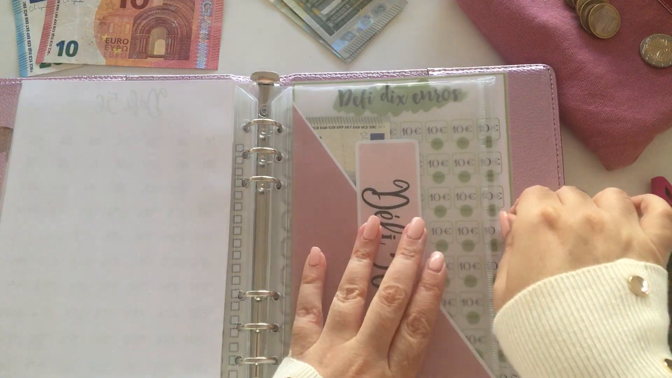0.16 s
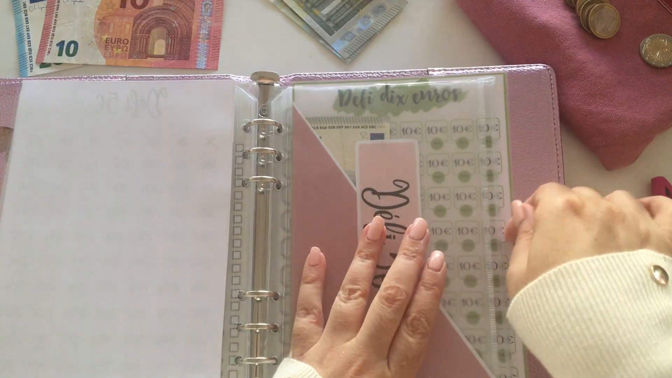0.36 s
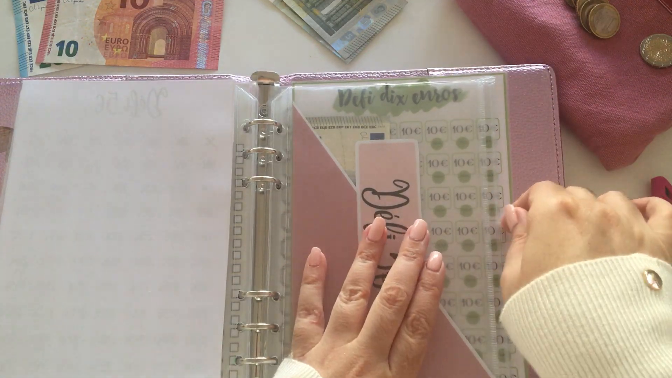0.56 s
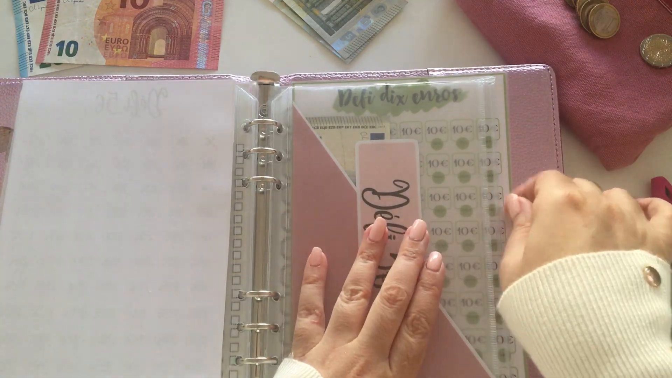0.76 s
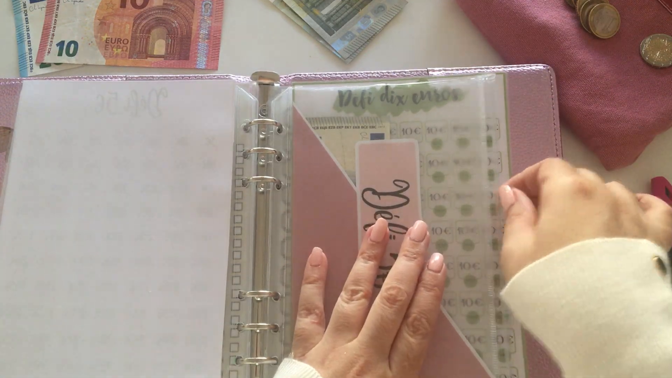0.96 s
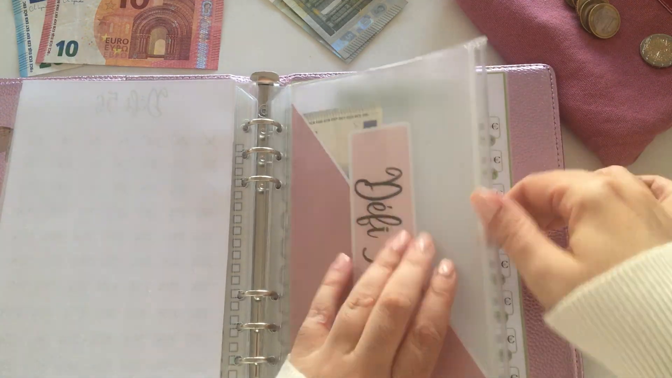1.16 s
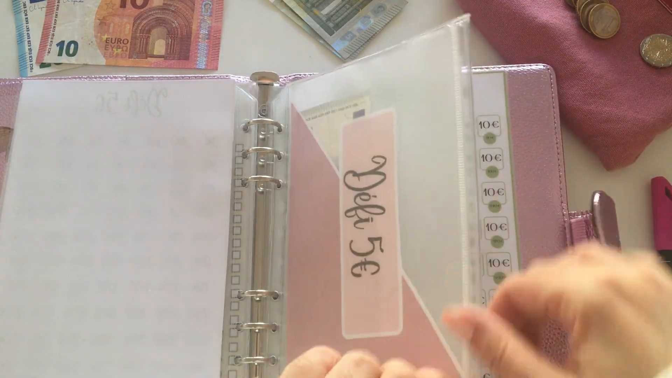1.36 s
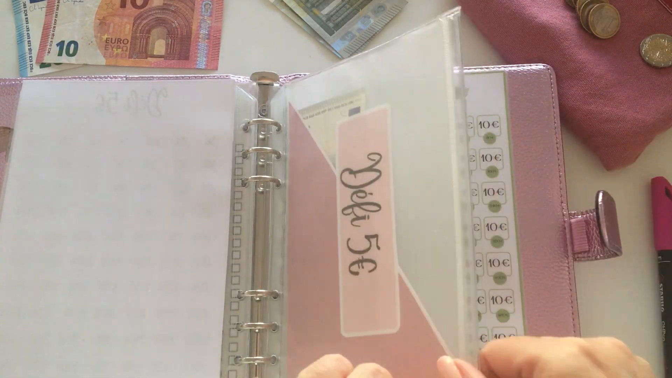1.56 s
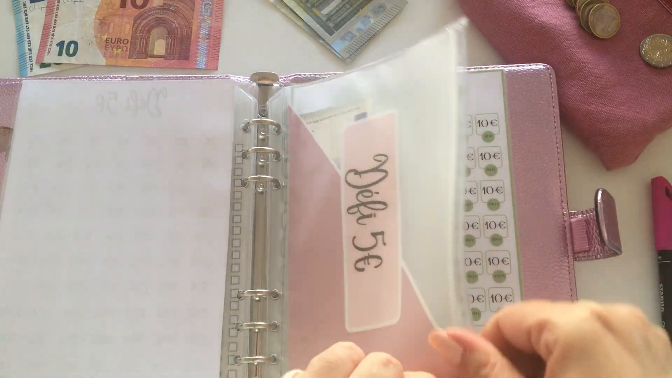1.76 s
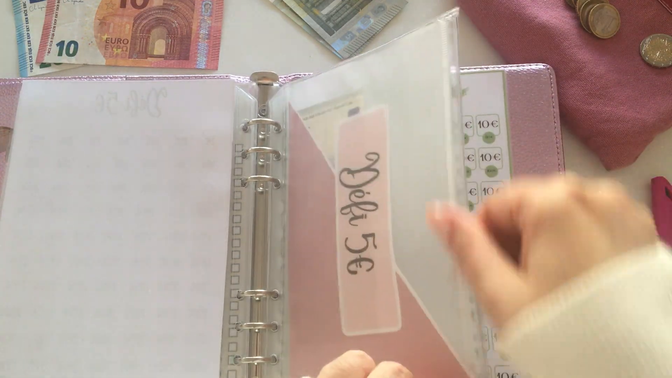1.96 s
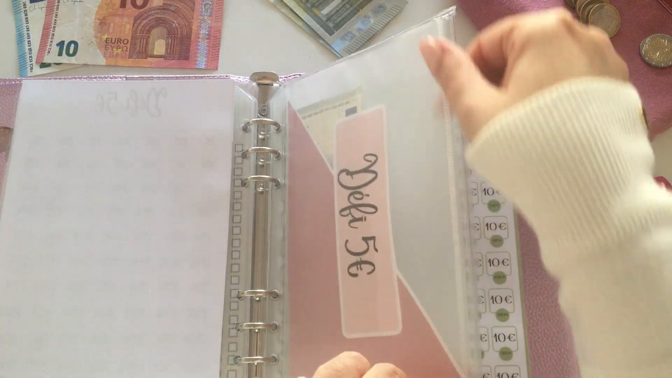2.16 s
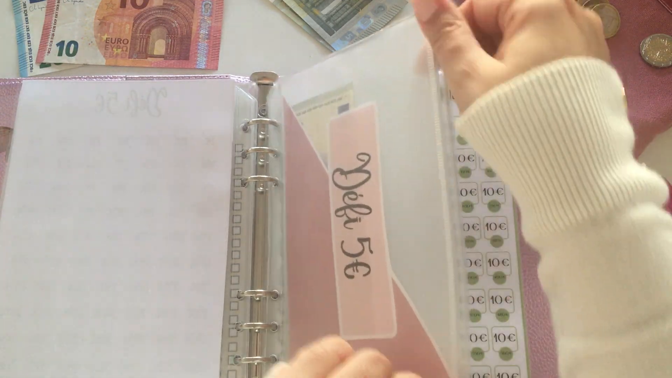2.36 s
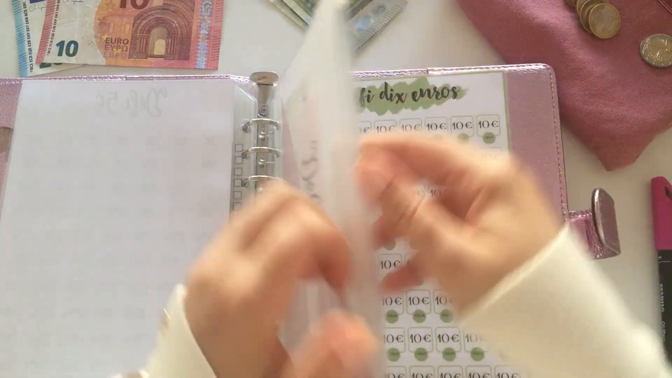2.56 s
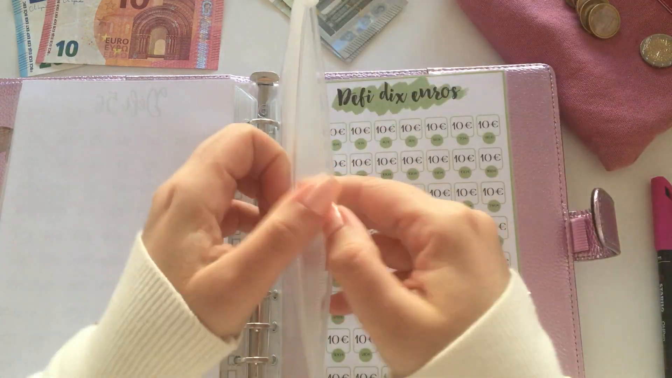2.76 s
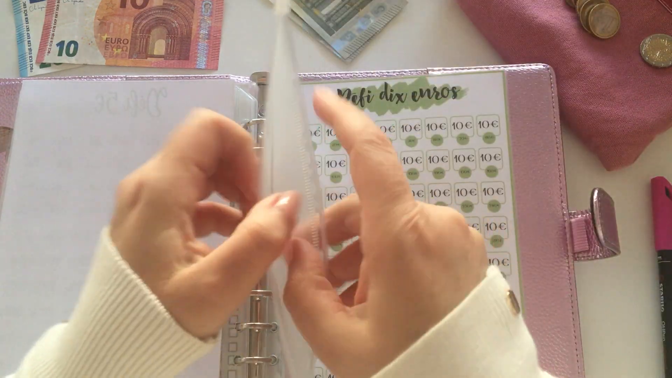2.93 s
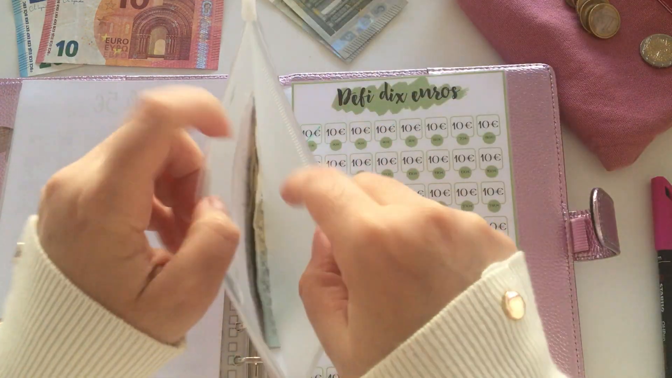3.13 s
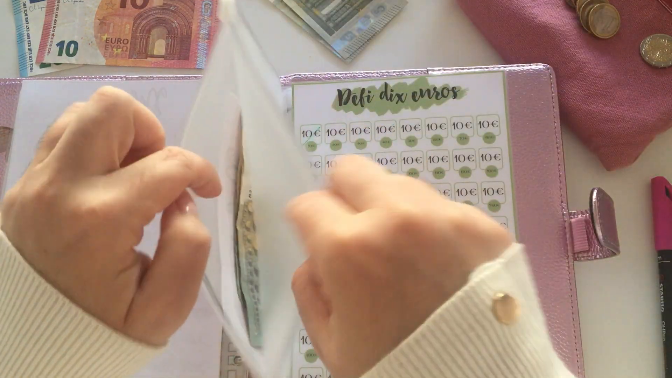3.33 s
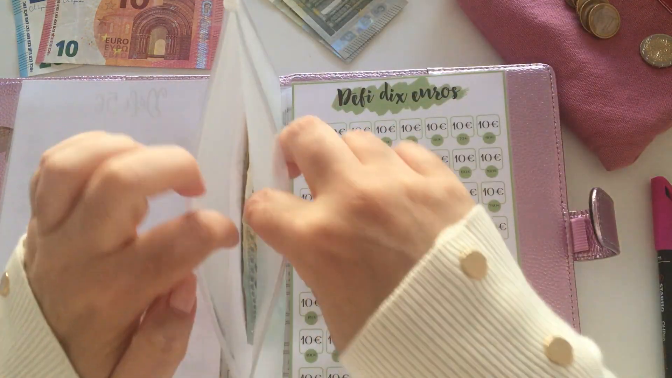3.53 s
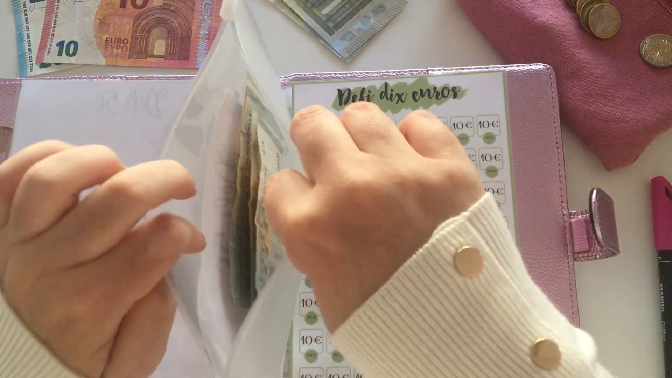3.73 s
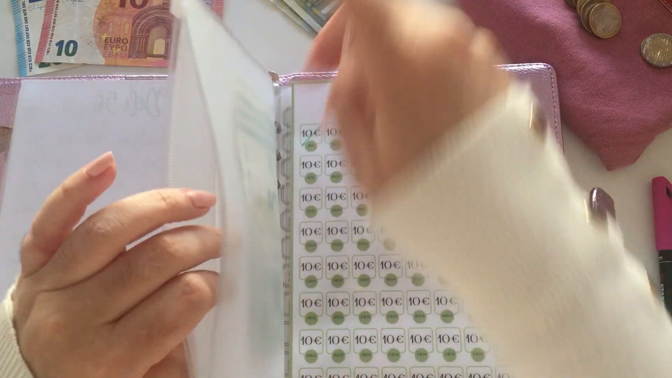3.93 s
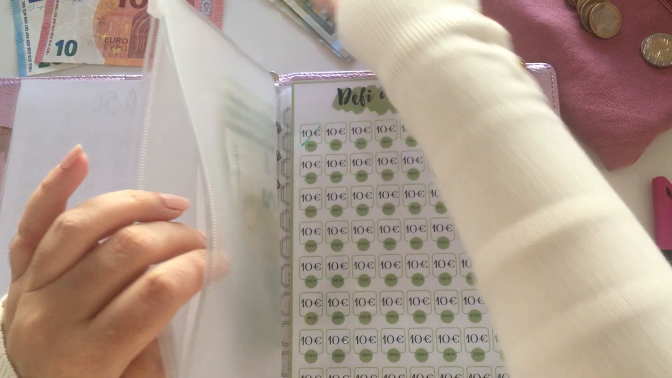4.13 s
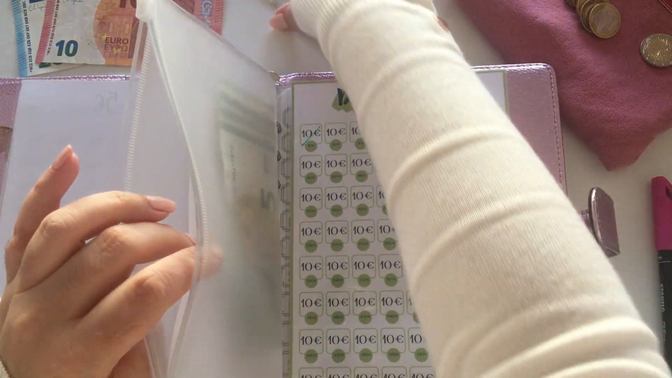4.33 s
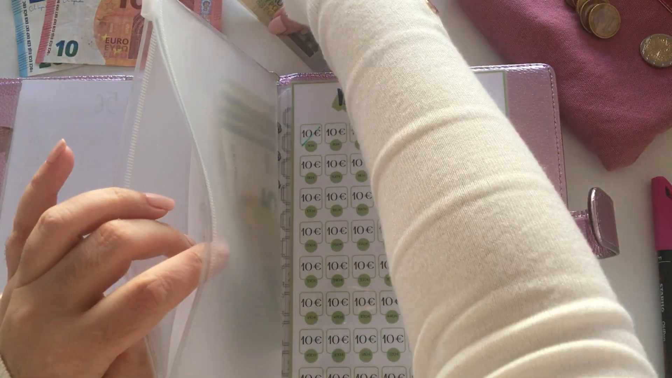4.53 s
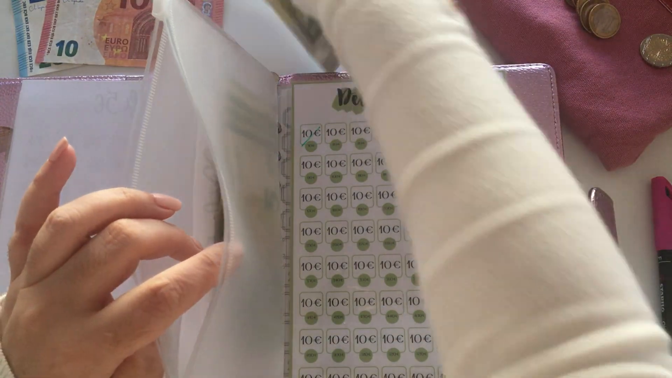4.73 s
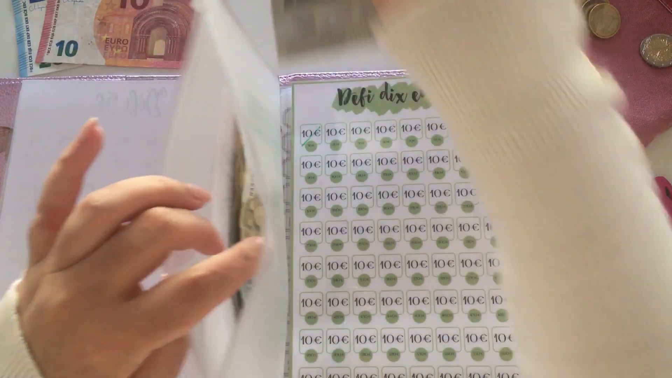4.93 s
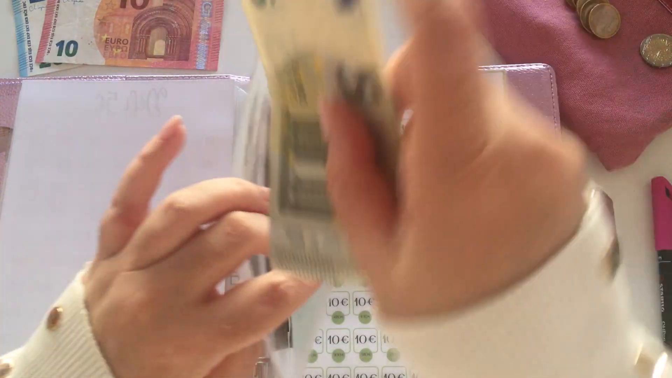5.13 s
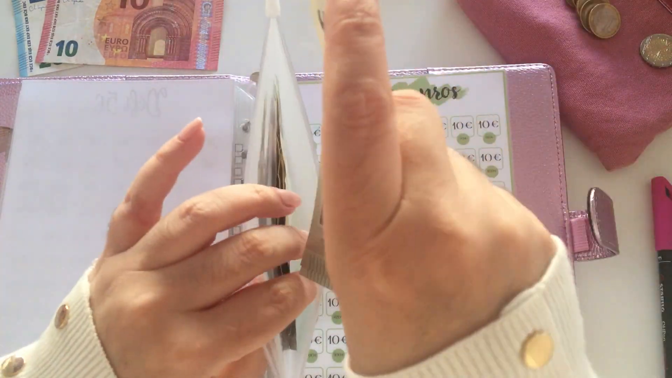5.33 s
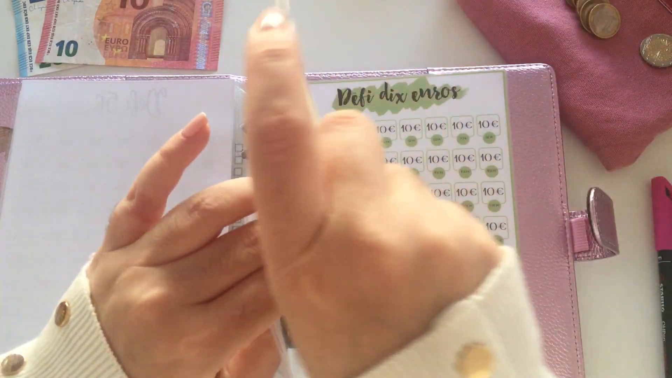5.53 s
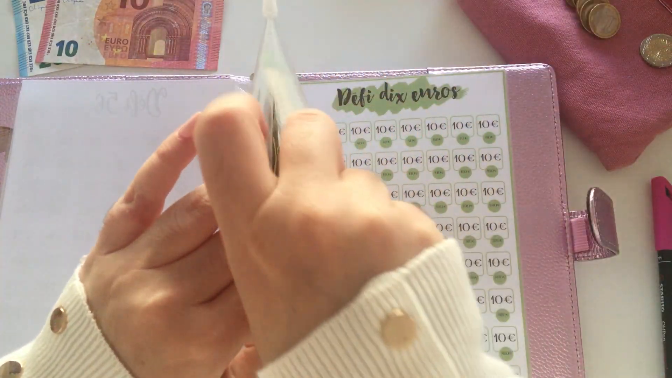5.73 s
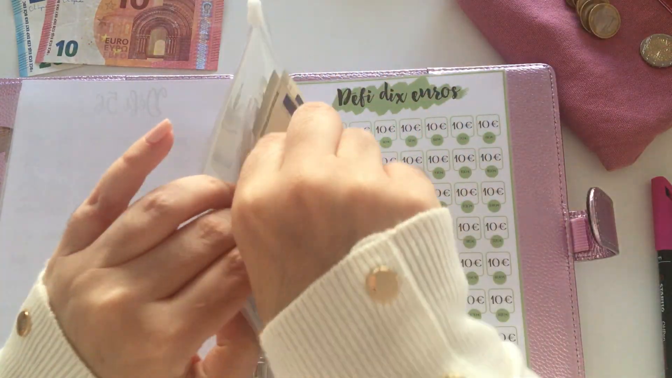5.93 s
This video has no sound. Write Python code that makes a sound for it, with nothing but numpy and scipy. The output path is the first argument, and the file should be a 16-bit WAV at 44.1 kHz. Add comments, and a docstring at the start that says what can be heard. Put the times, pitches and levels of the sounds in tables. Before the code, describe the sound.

Close, light rustling of plastic and paper in a small quiet room, broken by one loud hollow plastic pop and small sharp edge ticks.

```python
"""Banknote into a plastic sleeve

Hands turn a plastic sleeve in a ring binder on a table, open it and slide a banknote in, in a small quiet room.
Plastic and paper rub as filtered noise and tiny slips, in slides that speed up and slow to rest.
The stiff sleeve buckles with hollow pops and fingers bump the table: both are dying tones.
Edges flick as short noise bursts, a binder ring ticks, and soft air noise and faint hums lie behind.
"""
import sys
import numpy as np
from scipy import signal
from scipy.fft import rfft, irfft
from scipy.io import wavfile
from scipy.ndimage import map_coordinates

SR = 44100
rng = np.random.default_rng(int(sys.argv[2]) if len(sys.argv) > 2 else 0)


def store_pcm(level_fs):
    """Save levels as 16-bit WAV."""
    pcm = np.round(np.clip(level_fs, -1, 1) * 32767).astype(np.int16)
    wavfile.write(sys.argv[1], SR, np.atleast_2d(pcm).T)


N = 268701
TIME, FREQS = np.arange(N) / SR, np.fft.rfftfreq(N, 1 / SR)

# One sheet slides over another: start t/s, speeding up t/s, slowing down t/s, sheet friction level/dB,
# hollow body re friction level/dB, surface hiss re friction level/dB, gloss re hiss level/dB,
# taut patch f/Hz, taut patch re friction level/dB, crinkling 0-1
SLIDES = [ (0.95, 0.023, 0.81, -72.5, -2.5, -2.5, -2, 1920, -21, 0.54),
          (1.213, 0.0054, 0.066, -55, -5.5, -3, -7, 1110, 0, 0.73),
          (1.262, 0.055, 0.098, -56.5, -3, -1, -7, 1730, -3.5, 0.12),
          (1.3, 0.084, .055, -63.5, -8, -14, -27, 1060, 0.5, 0),
          (1.398, .06, 0.18, -80.5, -10, 2, -9, 1980, 0, 0.24),
          (1.6, 0.15, 0.2, -71, 0, 1.5, -9, 2700, -7, 0.16),
          (1.85, 0.043, .12, -73.5, -4, 2, -4, 2000, -6, 0.56),
          (1.928, 0.019, 0.25, -66, -1, 7, 1, 6600, -14, 0),
          (1.99, .14, 0.22, -71, -4, 8, -7, 6400, -1, 0.2), (2.19, 0.15, 0.1, -75.5, 1, -8, -3, 1860, 4, 0),
          (2.359, 0.047, 0.076, -63.5, -0.5, -1.5, -6, 1920, -13, .4),
          (2.468, 0.02, 0.17, -59.5, -2, 5, -5.5, 6060, -10, 0),
          (2.511, 0.071, 0.075, -58, -7.5, -8, -3, 2420, -6.5, 0.2),
          (2.58, 0.046, .13, -70, 0, 1, -3, 2000, -21, .3),
          (2.68, 0.21, .08, -76, 2.5, -3, -4, 3600, -3, 0.8),
          (2.869, .011, 0.034, -48, -6, -3.5, -4, 3650, -1.5, 0.3),
          (2.927, 0.039, 0.024, -55, -5.5, -0.5, -6, 2540, -4, 0),
          (2.975, 0.031, .033, -62, -3.5, -5, -6, 2450, 4.5, 0.3),
          (3.02, .11, .05, -69, -2, -20, -6, 1330, -8, .3),
          (3.108, 0.028, 0.26, -59.5, -1.5, -4.5, -8, 1350, -3, 0.1),
          (3.2, 0.075, 0.058, -58, -6, -5.5, -10, 3380, -9, 0.3),
          (3.335, 0.054, .23, -56.5, -7, -4.5, -9, 1500, -9, 0.37),
          (3.402, 0.029, 0.041, -50.5, -3.5, -11, -9, 2440, -21, 0.2),
          (3.76, 0.093, 0.073, -60, -13, -8.5, -1, 1200, -2, 0),
          (3.844, 0.01, .05, -52, -2.5, -2.5, -9, 2440, -1, 0.16),
          (3.93, 0.16, .19, -74, -5, -8, -5, 3630, -12, 0),
          (4.258, .05, 0.077, -56, 0, -6, -10.5, 1600, -8, 0.86),
          (4.366, 0.028, 0.038, -55.5, 1.5, 2.5, -3, 600, -0.5, 0),
          (4.39, 0.02, .13, -63, 2.5, -7, -1, 560, -7, 0.45),
          (4.5, 0.021, 0.2, -67.5, 0, -4.5, -2, 497, 3.5, .4),
          (4.59, 0.07, 0.071, -61.5, -2.5, -3, 0.5, 2230, -2.5, 0.5),
          (4.681, 0.059, 0.061, -63.5, -0.5, -0.5, -2.5, 2120, -4, 0.35),
          (4.8, 0.13, 0.017, -63.5, -4.5, 0, -1.5, 2030, -9, 0.26),
          (4.9, 0.063, 0.33, -71, -4, -3.5, -3, 2160, -3, 0.84),
          (5.183, .008, 0.056, -64, -4.5, 1.5, -3.5, 1200, -2, 0.75),
          (5.225, 0.091, 0.069, -59.5, -6, -0.5, -7, 2300, -3.5, 0),
          (5.314, 0.041, 0.0067, -45.5, -5, 1, -3, 8460, -9, .4),
          (5.401, 0.041, 0.066, -58, 0, -7, -8, 2100, -9, 0.1),
          (5.464, 0.064, 0.21, -52, -8, -2, -6, 2250, -3.5, 0.37),
          (5.62, 0.26, .08, -60.5, 0, -2, -6, 2240, -4.5, 0),
          (5.725, 0.034, 0.16, -62.5, -9.5, 7.5, -3, 6000, -8, 0.2),
          (5.92, 0.038, 0.18, -61, -7.5, 0, -5.5, 2200, -11, 0.6), ]
# Tone colour of the sliding sheets: f/Hz, relative level/dB
RUB_COLOUR = [(120, -16), (300, -5.5), (600, -6), (1000, -6), (1600, -1), (2300, 4.5), (3000, 6.5),
              (3800, 3), (4800, -4), (6500, 1), (9000, -2), (10500, -13.5), (12500, -12), (16000, -24)]
# Faint rub between the slides, its body, sheet, surface and gloss: level re RESTING_DB/dB
RESTING_MIX_DB = [-2.5, -0.5, 0, -3]
# The sleeve buckles: t/s, peak level/dB, pitch factor (stiffness)
POPS = [(0.299, -50.5, 0.52), (0.556, -55.5, 0.8), (1.1400, -29, 0.91), (2.029, -45.5, 0.81),
        (3.1540, -28, 0.86), (3.1775, -41, 0.72), (3.637, -14, 0.94), (3.643, -30.5, 0.48),
        (3.6588, -39, 0.88), (3.677, -36, 0.43), (3.9583, -46.5, 1.13), (3.966, -47, 1.43),
        (4.381, -35.5, 0.5), (4.399, -48, 0.58), (4.552, -43.5, 0.62), (4.574, -44, 1.1),
        (4.942, -42.5, 0.63), (5.2, -41, 0.6), (5.6105, -31.5, 1.05), (5.991, -38, 0.91)]
# Tones the sleeve rings with, before the pitch factor: f/Hz, relative level/dB, time to fall 60 dB t/s
SLEEVE_MODES = [(242, -52, 0.055), (420, -22, 0.028), (537, -14, 0.037), (686, 7, 0.0064),
                (966, -14, 0.017), (1000, 4, 0.009), (1492, -11.5, 0.027), (1644, 2.5, 0.0094),
                (2110, -7, 0.012), (2330, 2.5, 0.0075), (2840, -8, 0.0079), (3340, -21, 0.008),
                (3610, -30.5, 0.034)]
# Soft bumps on binder and table: t/s, peak level/dB, f/Hz, time to fall 60 dB t/s
BUMPS = [(0.586, -47, 164, 0.04), (1.142, -49.5, 266, .02), (2.966, -54.5, 248, .016),
         (3.621, -44, 326, 0.041), (3.636, -37, 89.5, .027), (3.639, -35, 238, 0.032),
         (3.658, -38, 380, .036), (4.2637, -25, 292, 0.041), (4.266, -41.5, 60, 0.087),
         (4.302, -38, 317, 0.021), (4.356, -43, 345, 0.022), (4.399, -30.5, 292, 0.0143),
         (4.521, -51.5, 317, .07), (4.547, -44, 350, .02), (4.573, -43, 287, .025),
         (5.611, -37.5, 374, 0.077), (5.614, -41, 245, 0.027)]
# Nails, creases and paper edges flick: t/s, peak level/dB, centre f/Hz, fade t/s
FLICKS = [(0.278, -48.5, 6000, .002), (0.537, -54.5, 4450, 0.0045), (0.785, -49, 6600, 0.0035),
          (0.841, -43.5, 4300, 0.00067), (0.969, -44, 7500, .0024), (0.986, -42, 7900, .0015),
          (1.022, -43, 6550, 0.0016), (1.040, -35.5, 10000, 0.00061), (1.1474, -37.5, 5830, 0.00097),
          (1.293, -37, 5240, 0.001), (1.6, -49, 7500, 0.0026), (1.725, -46.5, 3520, .0015),
          (1.777, -37.5, 12300, 0.00048), (2.432, -45, 8500, .005), (2.469, -49, 6420, 0.0047),
          (2.853, -48.5, 2930, 0.0079), (3.637, -45, 6900, 0.012), (3.672, -42.5, 5810, 0.0018),
          (4.2619, -30, 2960, 0.0038), (4.551, -44.5, 3000, 0.0016), (4.575, -43.5, 3000, 0.0027),
          (5.3435, -27.5, 8000, 0.0037), (5.6112, -18, 4860, 0.0036), (5.973, -38.5, 7100, 0.0062),
          (5.9913, -26, 7460, 0.0013)]
# A binder ring is nudged: t/s, peak level/dB
RING_TAPS = [(0.5858, -40.5)]
# Tones of the binder ring: f/Hz, relative level/dB, time to fall 60 dB t/s
RING_MODES = [(580, -7.5, 0.037), (1580, -7.5, 0.024), (2140, -7, 0.034), (2730, -5, 0.013),
              (3040, 2, 0.021)]
# Echo of the room: f/Hz, time to fall 60 dB t/s, relative level/dB
ROOM = [(100, 0.17, 3.5), (300, 0.43, -14.5), (905, 0.35, -6.5), (2200, 0.33, -14), (5100, 0.25, -10.5),
        (13500, 0.15, -12)]
# Tone colour of the room's air noise: f/Hz, relative level/dB
AIR_COLOUR = [(22, -32), (40, 3), (60, 5.5), (110, 1.5), (160, -2), (215, -2.5), (280, -5.5), (350, -12),
              (600, -15), (1200, -22), (3000, -23), (8000, -26), (16000, -31)]
# Faint hums that come and go: start t/s, end t/s, rms level when fully on/dB, f/Hz
HUMS = [(0.0, 1.2, -73, 210), (0.1, 1.77, -77, 269), (1.4, 6.6, -81.5, 63.7), (4.6, 6.09, -74, 202.3),
        (4.8, 6.6, -71.5, 99.3), (4.85, 5.6, -74, 273.4)]

SPEED_LAW = 1.19      # friction amplitude grows with this power of the sliding speed
RESTING_DB = -82.5    # hands never lie quite still
RUB_LIFT_DB = 1.42    # raises all the rubbing, slides and rest alike
# Where the body hands over to the sheet, the sheet to its hiss, the hiss to its glossy top
SHEET_HZ, SURFACE_HZ, GLOSS_HZ = 1760, 5360, 10400
# The taut patch's resonance is this wide, plus this share of its pitch
PATCH_WIDTH_HZ, PATCH_WIDTH_SHARE = 180, 0.11
FLICK_SWELL = 0.16    # the drag before a flick, as a share of its fade
# Faint ticks at random moments, with peak levels up to the spread above or below STRAY_DB
STRAY_COUNT, STRAY_DB, STRAY_SPREAD_DB, STRAY_HZ, STRAY_FADE_S = 30, -59, 4.5, 5940, 0.0016
AIR_DB = -67          # rms
CUTOFF_HZ = 15850


def rubbing():
    """The same slips and creases drive the hollow body, the sheet and its surface; a taut patch rings along."""
    gains = np.array([from_db(db) * slide_gain(start, rise, fall) for start, rise, fall, db, *_ in SLIDES])
    grain = rms_one(friction(slips_per_s=3000, spread_db=3.0, smooth=0.95, judder_db=2.0))
    grain = grain + creasing(gains) * crinkles(per_s=190, spread_db=14)
    grain = shifting(grain, depth_db=3.2, change_s=0.06, ripple_hz=330)
    grain = coloured(grain, RUB_COLOUR)
    edges = [230, SHEET_HZ, SURFACE_HZ, GLOSS_HZ, 17000]
    # body, sheet, surface hiss and gloss, from low to high
    layers = [rms_one(band(grain, low, high, order=3)) for low, high in zip(edges, edges[1:])]

    slips = friction(slips_per_s=3000, spread_db=5.0, smooth=0.44, judder_db=3.2)
    resting_power = from_db(RESTING_DB + np.array(RESTING_MIX_DB)) ** 2
    power = np.outer(resting_power, np.ones(N))
    patches = np.zeros(N)
    for gain, (*_, body_db, hiss_db, gloss_db, patch_hz, patch_db, _) in zip(gains, SLIDES):
        mix = from_db([body_db, 0, hiss_db, hiss_db + gloss_db])
        power += np.outer(mix, gain) ** 2    # overlapping slides add their power
        half_width = min(PATCH_WIDTH_HZ + PATCH_WIDTH_SHARE * patch_hz, patch_hz) / 2
        patch = rms_one(band(slips, patch_hz - half_width, patch_hz + half_width))
        patches += from_db(patch_db) * gain * patch
    sheets = np.sum(np.sqrt(power) * layers, axis=0)
    return from_db(RUB_LIFT_DB) * (sheets + patches)


def slide_gain(start, rise, fall):
    """A sheet speeds up and slows to rest along quarter sines; its friction follows the speed."""
    nearness = np.minimum((TIME - start) / rise, (start + rise + fall - TIME) / fall)
    speed = np.sin(np.pi / 2 * np.clip(nearness, 0, 1))
    return speed ** SPEED_LAW


def friction(slips_per_s, spread_db, smooth, judder_db):
    """Tiny slips of uneven size over a smooth hiss; the sheet sticks and goes in clumps."""
    sizes = from_db(spread_db * np.minimum(rng.exponential(1, N), 4))
    signed = sizes * rng.choice([-1, 1], N)
    slips = rms_one(signed * (rng.random(N) < slips_per_s / SR))
    hiss = smooth * rng.standard_normal(N)
    return (slips + hiss) * from_db(judder_db * drift(rate=30))


def creasing(gains):
    """How much the sheets crinkle at each moment: the loudest slide counts most."""
    weights = gains ** 2 + from_db(RESTING_DB) ** 2 / len(gains)
    amounts = np.clip([row[-1] for row in SLIDES], 0, 1)
    return amounts @ weights / weights.sum(axis=0)


def crinkles(per_s, spread_db):
    """Sparse creases give way, each with about a millisecond of rattle; rms 1."""
    snaps = from_db(spread_db * rng.random(N)) * (rng.random(N) < per_s / SR)
    keep = np.exp(-1 / (0.0011 * SR))    # share of the rattle left after each sample
    rattle = signal.lfilter([1], [1, -keep], snaps + 1e-18)
    return rms_one(rattle * rng.standard_normal(N))


def shifting(x, depth_db, change_s, ripple_hz):
    """A bending sheet keeps changing its resonances, so peaks and dips come and go in its spectrum."""
    hz, s, cells = signal.stft(x, SR, nperseg=512)
    field = rng.standard_normal((200, 200))    # random heights over pitch and time
    places = np.meshgrid(hz / ripple_hz, s / change_s, indexing="ij")
    ripple = map_coordinates(field, places, order=1, mode="mirror")
    return signal.istft(cells * from_db(depth_db * ripple), SR)[1][:N]


def sleeve_pops(top_hz, give_s):
    """Each buckle snaps the stiff plastic at another spot, so its modes share the blow a little differently."""
    out, t = np.zeros(N), TIME[:SR // 200]
    for s, db, pitch in POPS:
        modes = [(hz, level + rng.standard_normal(), t60) for hz, level, t60 in SLEEVE_MODES]
        snap = np.gradient(struck(modes, pitch))    # the skin radiates its acceleration
        snap[:len(t)] *= 1 - np.exp(-t / give_s)    # the fold takes an instant to flip through
        add(out, s, db, band(snap, 99, top_hz * pitch))
    return out


def bumps(soft_hz):
    """Each soft bump rings one low tone that dies away, with its treble softened."""
    out = np.zeros(N)
    for s, db, hz, t60 in BUMPS:
        bump = np.gradient(struck([(hz, 0, t60)]))
        add(out, s, db, band(bump, 53, soft_hz))
    return out


def ring_taps():
    """A nudged metal ring gives a thin tick of several short tones."""
    out = np.zeros(N)
    for s, db in RING_TAPS:
        add(out, s, db, struck(RING_MODES))
    return out


def flicks(width, top_hz):
    """An edge drags briefly, lets go and rattles out in a few milliseconds, losing its highest treble."""
    out, t = np.zeros(N), TIME[:SR // 8] - 1 / 50    # time zero is the letting go
    for s, db, hz, fade in FLICKS + stray_ticks():
        envelope = np.exp(-np.abs(t) / np.where(t < 0, FLICK_SWELL * fade, fade))
        burst = rng.standard_normal(len(t)) * envelope
        burst = band(burst, hz / (1 + width), hz * (1 + width), order=1)
        add(out, s + t[0], db, band(burst, 160, top_hz, order=1))
    return out


def stray_ticks():
    """Small flicks scattered at random moments, as rows like those of FLICKS."""
    rows = []
    for when, size in rng.random((STRAY_COUNT, 2)):
        db = STRAY_DB + STRAY_SPREAD_DB * (2 * size - 1)
        rows.append((when * N / SR, db, STRAY_HZ, STRAY_FADE_S))
    return rows


def room(x, first_wall_s):
    """Blurred reflections that build up after the first wall, each band dying at its own rate."""
    t = TIME[:SR // 2]
    response = np.zeros(len(t))
    edges = np.geomspace(60, 18000, 11)
    for low, high in zip(edges, edges[1:]):
        hz = np.sqrt(low * high)
        build_up = 1 - np.exp(-(t / first_wall_s) ** 2)
        decay = from_db(-60 * t / at_hz(ROOM, hz)) * build_up
        tail = rng.standard_normal(len(t)) * decay / np.linalg.norm(decay)
        response += from_db(at_hz(ROOM, hz, axis=2)) * band(tail, low, high)
    return signal.fftconvolve(x, response)[:N]


def air():
    """The quiet room's background: steady noise, strongest in the bass."""
    return from_db(AIR_DB) * rms_one(coloured(rng.standard_normal(N), AIR_COLOUR))


def hum(waver_hz):
    """Low tones from far off, wavering in pitch."""
    out = np.zeros(N)
    for start, end, db, hz in HUMS:
        phase = 2 * np.pi * np.cumsum(hz + waver_hz * drift(rate=4)) / SR
        tone = np.sqrt(2) * np.sin(phase)    # rms 1
        out += from_db(db) * tone * held(TIME, start, end, ramp=0.14)
    return out


def held(t, start, end, ramp):
    """A level that rises, holds and falls again."""
    return np.sin(np.pi / 2 * np.clip(np.minimum(t - start, end - t) / ramp, 0, 1))


def struck(modes, pitch=1):
    """One blow sets off several sines, each dying away at its own rate."""
    t = TIME[:SR // 4]
    out = np.zeros(len(t))
    for hz, db, t60 in modes:
        out += from_db(db - 60 * t / t60) * np.sin(2 * np.pi * hz * pitch * t)
    return out


def add(track, s, peak_db, sound):
    """Lay a sound into the track at a time and peak level."""
    start = max(round(s * SR), 0)
    part = sound[:N - start]
    track[start:start + len(part)] += from_db(peak_db) * part / np.abs(sound).max()


def drift(rate):
    """A smooth random wander with rms 1; a higher rate in Hz wanders faster."""
    return rms_one(irfft(rfft(rng.standard_normal(N)) / (1 + (FREQS / rate) ** 2), N))


def band(x, low_hz, high_hz, order=2):
    """Keep only the pitches between two limits, without looking ahead in time."""
    edges = [low_hz, min(high_hz, 0.45 * SR)]
    return signal.sosfilt(signal.butter(order, edges, "band", fs=SR, output="sos"), x)


def coloured(x, spectrum):
    """Give a steady texture a tone colour."""
    return irfft(rfft(x) * from_db(at_hz(spectrum, FREQS)), N)


def at_hz(points, hz, axis=1):
    """Read a table column between its rows, on a log-frequency axis."""
    points = np.array(points)
    return np.interp(np.log(np.maximum(hz, 1)), np.log(points[:, 0]), points[:, axis])


def rms_one(x):
    """Scale to rms 1."""
    return x / np.sqrt(np.mean(x ** 2) + 1e-20)


def from_db(db):
    """Decibels to gain."""
    return 10 ** (np.asarray(db) / 20)


def scene():
    """The handling, its reflections in the room, the air noise and the low hums."""
    hands = rubbing()
    hands = hands + sleeve_pops(top_hz=3400, give_s=0.00041)
    hands = hands + bumps(soft_hz=670) + ring_taps()
    hands = hands + flicks(width=0.94, top_hz=12700)
    background = air() + hum(waver_hz=1.0)
    return (hands + room(hands, first_wall_s=0.0026) + background)[None]


def record(dry):
    """Cut the top steeply above the cutoff."""
    return signal.sosfilt(signal.ellip(10, 0.1, 80, CUTOFF_HZ, fs=SR, output="sos"), dry)


dry = scene()
out = record(dry)
store_pcm(out)
```